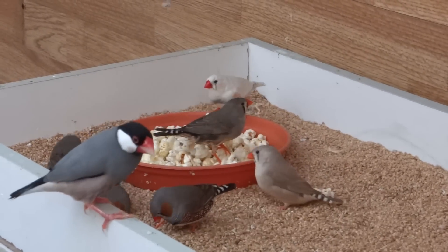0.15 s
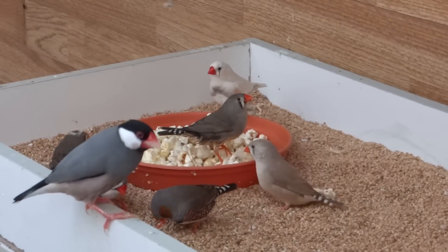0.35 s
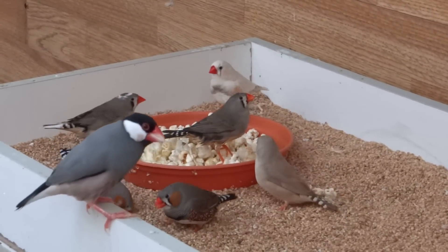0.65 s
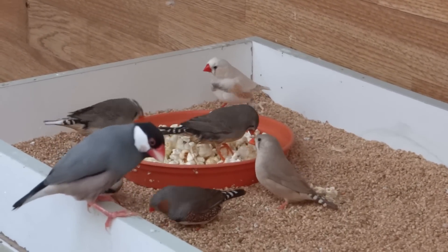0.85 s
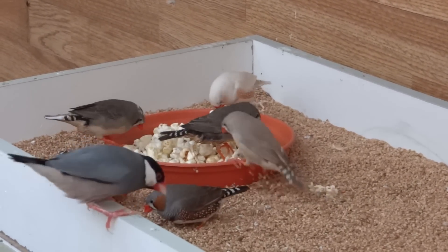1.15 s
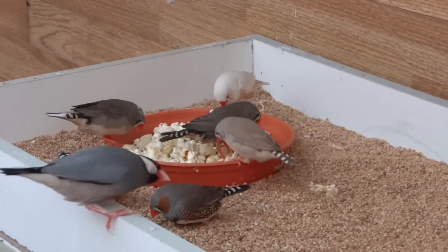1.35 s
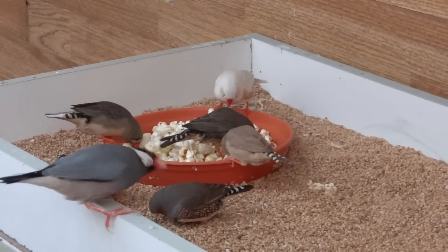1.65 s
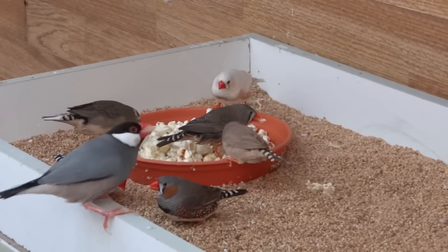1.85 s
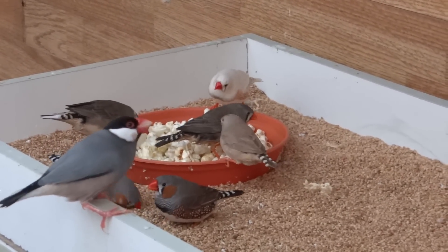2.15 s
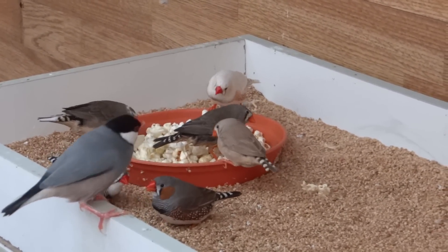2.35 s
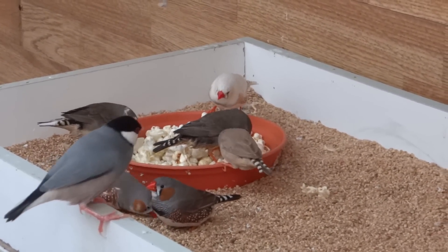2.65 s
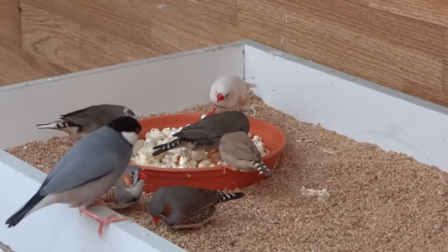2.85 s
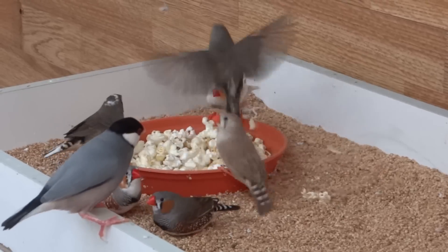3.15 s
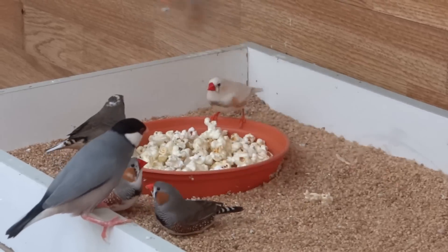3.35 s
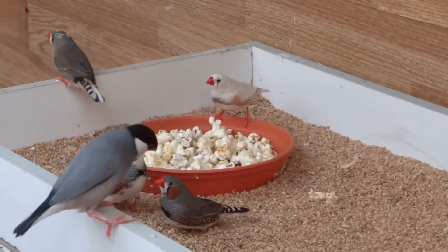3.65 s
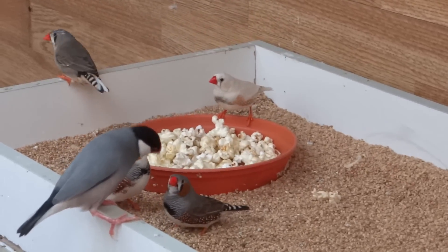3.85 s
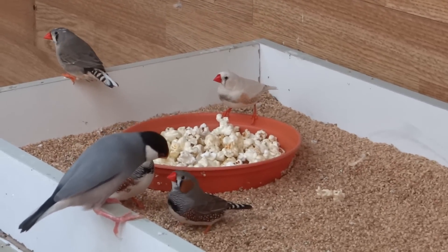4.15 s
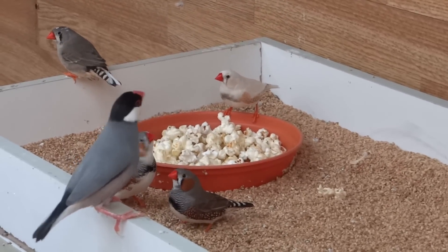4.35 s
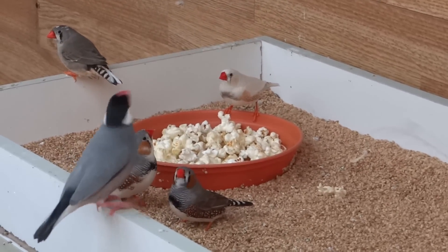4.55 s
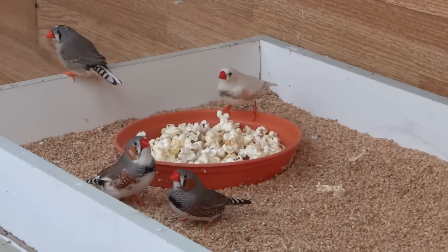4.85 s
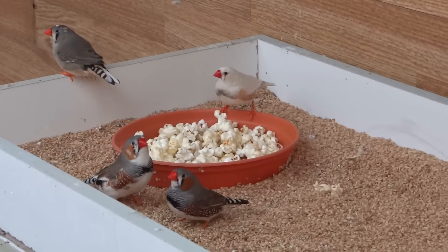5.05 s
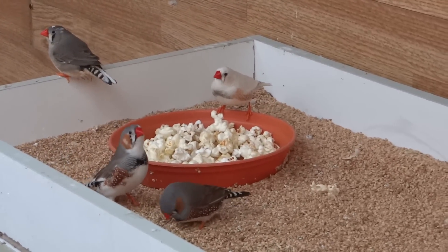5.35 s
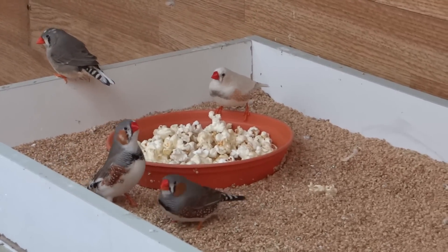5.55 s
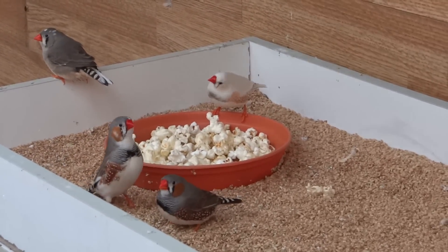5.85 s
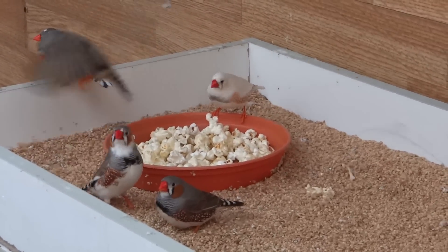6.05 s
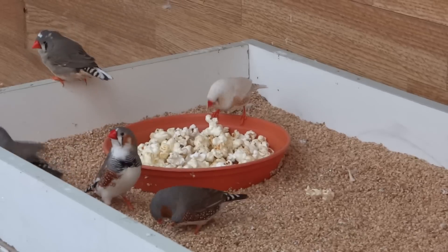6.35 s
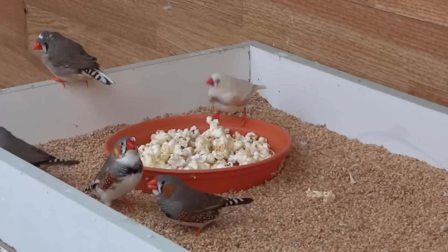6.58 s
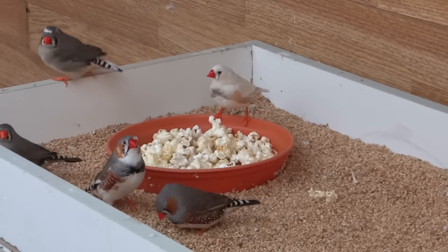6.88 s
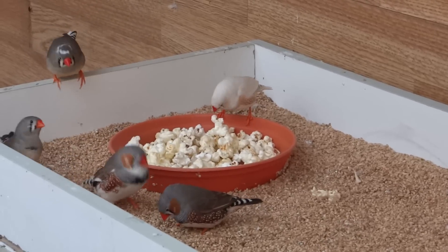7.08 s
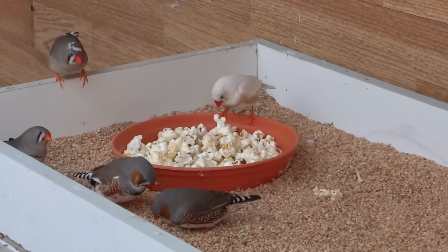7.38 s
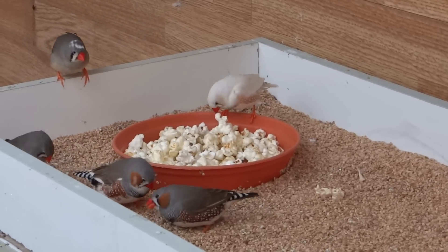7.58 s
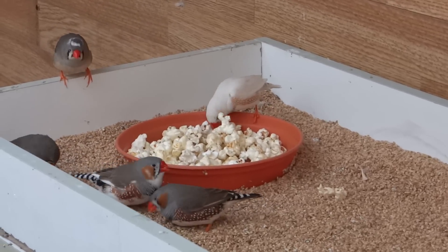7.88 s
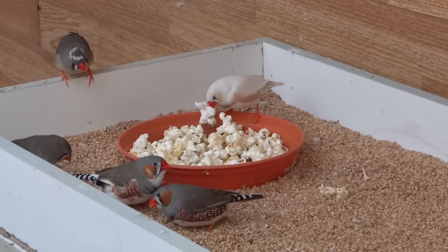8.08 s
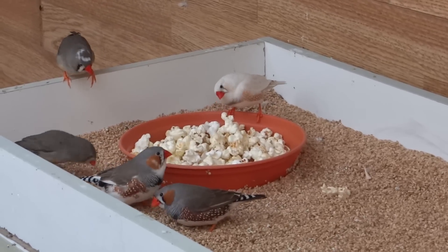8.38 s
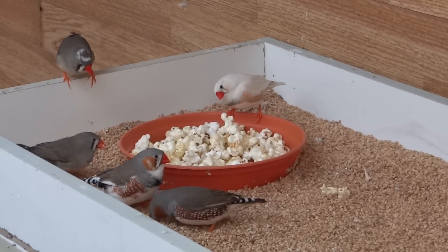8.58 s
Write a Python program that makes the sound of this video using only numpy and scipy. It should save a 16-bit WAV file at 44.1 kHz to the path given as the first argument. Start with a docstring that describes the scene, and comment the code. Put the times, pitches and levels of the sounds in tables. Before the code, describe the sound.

A small live room with a faint low murmur, finches close to the microphone. From 0 to 2.7 s, soft feather flutters at the start and near 1.5 s mix with tiny dry ticks of beaks and claws on grit and dish; a short nasal note sounds at 0.7 s, a faint thin whistle around 2.3 s. At 2.9-3.4 s hard wing strokes and airy flapping burst out, with small nasal calls to 3.6 s. A heavier flurry at 4.1-4.5 s brings snapping wing claps, a low draught and a bright double yip; lighter claps follow until 5 s. From 5.5 to 7.2 s come nasal, slightly rough whines, with sharp yips just after 7 s. Thin whimpers and short nasal notes continue. At 7.9 s a high squeal leaps and tumbles, then harsh rattling scolds from 8.1 s peak near 8.5 s and continue almost to the end.

```python
"""Finches crowd a food dish on a tray of grit in a small, live room, close to the microphone.
Short nasal notes, yips and thin whistles come from rough-edged harmonics shaped by throat and beak.
Wing beats arrive in uneven bursts of pulsing air and feather noise; claps and ticks are snaps of noise.
A quarrel builds from long whining calls to a squeal and a run of harsh scolds.
Table levels are source settings, before the room and the mix; colours are relative levels."""
import sys
import numpy as np
from scipy import signal
from scipy.fft import rfft, irfft
from scipy.io import wavfile
from scipy.ndimage import uniform_filter1d, minimum_filter1d

SR = 44100
rng = np.random.default_rng(int(sys.argv[2]) if len(sys.argv) > 2 else 0)


def file_out(sig):
    """Save sig as 16-bit WAV at sys.argv[1]."""
    # one column per channel
    cols = np.atleast_2d(sig).T
    # limit, then scale
    lim = np.clip(cols, -1, 1)
    pcm = np.round(lim * 32767).astype(np.int16)
    wavfile.write(sys.argv[1], SR, pcm)


N = 384552
TIME = np.arange(N) / SR
CUTOFF_HZ = 16200  # upper edge of the sound


def from_db(db):
    """Decibels to gain."""
    return 10 ** (np.asarray(db) / 20)


def rms_one(x):
    """Scale to unit power."""
    return x / np.sqrt(np.mean(x ** 2) + 1e-20)


def follow(rows, t):
    """Each column of a curve at the times t."""
    s, *columns = np.transpose(rows)
    return [np.interp(t, s, c) for c in columns]


def at_hz(points, hz):
    """Read a spectrum on a log-frequency axis."""
    f, value = np.transpose(points)
    return np.interp(np.log(np.maximum(hz, 1)), np.log(f), value)


def colour(x, points):
    """Causal (minimum-phase) filter of unit energy with the given spectrum."""
    size = 2048
    level_db = at_hz(points, np.arange(size + 1) * SR / (2 * size))
    cepstrum = irfft(np.log(from_db(level_db)))
    # folding the cepstrum forward in time makes the filter causal
    cepstrum[1:size] *= 2
    cepstrum[size + 1:] = 0
    response = irfft(np.exp(rfft(cepstrum)))
    return signal.fftconvolve(x, response / np.linalg.norm(response))[:len(x)]


def wander(rate, size):
    """Random motion of spread near 1, through straight lines between rate random points a second."""
    knots = rng.standard_normal(8192)
    return np.interp(np.arange(size) * rate / SR, np.arange(len(knots)), knots)


def add(out, s, x):
    """Mix a sound in at time s."""
    at = max(round(s * SR), 0)
    out[at:at + len(x)] += x[:max(N - at, 0)]


def gate(t, length, attack, release):
    """Attack, hold until the length is over, release."""
    return np.clip(t / attack, 0, 1) * np.clip(1 - (t - length) / release, 0, 1)


# Low room murmur of air and appliances: time_s, level_db
MURMUR = [(0.0, -60.5), (0.58, -58), (1.14, -66.5), (1.53, -58.5), (2.57, -65), (3.54, -58.5), (4.25, -54),
          (4.9, -66.5), (6.04, -61), (7.09, -70), (8.06, -70), (8.72, -72.5)]
# Colour of the quiet room: frequency_hz, level_db
QUIET_COLOUR = [(18, -53), (30, -13), (48, -74), (89, -7.5), (156, -13.5), (230, 2), (449, -16.5),
                (761, -16), (1180, -36), (1270, -26), (1510, -27), (1740, -16.5), (2000, -26.5),
                (2600, -83), (4400, -120), (5000, -36), (9000, -27), (15000, -30)]


def background():
    """Coloured noise of slowly changing level, nearly alike in both channels."""
    mid = rms_one(colour(rng.standard_normal(N), QUIET_COLOUR))
    side = rms_one(colour(rng.standard_normal(N), QUIET_COLOUR))
    level_db = follow(MURMUR, TIME)[0] + 4.5
    return from_db(level_db) * (mid + from_db(-19.0) * side * np.array([[1], [-1]]))


def crackle(size, grain_db):
    """Barbs or grains slipping over each other: noise made of tiny unequal snaps."""
    grain = np.minimum(rng.exponential(1, size), 5)
    return rms_one(rng.standard_normal(size) * from_db(grain_db * grain))


# Bursts of wing beats: start_s, length_s, pushed_air_db, feather_rustle_db
FLUTTER_BURSTS = [(-.03, 0.033, -47, -48), (0.122, 0.1038, -49, -53), (0.381, 0.0896, -46.5, -55),
                  (1.209, 0.057, -55, -54.5), (1.35, 0.0374, -61, -52.5), (1.5, 0.146, -47.5, -50),
                  (2.863, 0.0285, -57, -71), (3.029, 0.062, -42.5, -59.5), (3.207, 0.101, -42, -50),
                  (3.369, 0.0555, -43, -67.5), (3.797, 0.08, -45.5, -53), (4.083, 0.197, -48.5, -48.5),
                  (4.231, 0.2264, -40.5, -46), (4.456, 0.099, -43, -45), (4.891, 0.0267, -49, -68),
                  (5.757, 0.2, -52, -49.5)]
# Restless shuffling of the flock between the bursts: time_s, level_db
SHUFFLING = [(0, -62), (.65, -53), (1.0, -59.5), (1.5, -62.5), (1.9, -66), (2.75, -66), (2.93, -60.5),
             (3.1, -51.5), (3.7, -49), (4.65, -49.5), (5.15, -53.5), (5.5, -62.5), (6.1, -58.5), (6.9, -66),
             (8.72, -64)]
# Hard wing strokes at take-off: start_s, length_s, level_db
TAKEOFF_STROKES = [(2.937, 0.0758, -32), (3.037, 0.0617, -34), (3.387, 0.027, -39.5), (3.801, 0.035, -40.5),
                   (4.266, 0.072, -39.5)]
# Colours of pushed air, rubbing feathers and hard strokes: frequency_hz, level_db
AIR_COLOUR = [(30, -22.5), (70, -20.5), (150, -18), (250, -12), (330, 5), (450, -6), (620, 2), (900, 1),
              (1200, 1), (2000, -4.5), (3500, -25.5), (8000, -31)]
FEATHER_COLOUR = [(800, -5.5), (2000, -2), (3500, -1), (6000, -3.5), (8700, 1.5), (10000, -4.5),
                  (11500, -18), (15500, -18.5)]
STROKE_COLOUR = [(200, -28.5), (600, -9), (1100, 5.5), (2800, 6.5), (5000, 3), (8700, -1), (11500, -12.5),
                 (15500, -24)]
BEATS_PER_S = 22.4  # mean wing beat rate
BURST_ATTACK_S, BURST_RELEASE_S = 0.0224, 0.0526
SHUFFLE_AIR_DB = 0.5  # air that the shuffling pushes, relative to its rustle


def wings():
    """Each beat pushes a puff of air and rubs the feathers; bursts of uneven beats rise from the shuffling."""
    shuffle_db, = follow(SHUFFLING, TIME)
    push = from_db(shuffle_db + SHUFFLE_AIR_DB)
    rub = from_db(shuffle_db)
    for s, length, air_db, feather_db in FLUTTER_BURSTS:
        effort = gate(TIME - s, length, BURST_ATTACK_S, BURST_RELEASE_S)
        # powers add
        push = np.hypot(push, from_db(air_db) * effort)
        rub = np.hypot(rub, from_db(feather_db) * effort)

    beat = 2 * np.pi * np.cumsum(BEATS_PER_S * (1 + 0.14043 * wander(9.8, N))) / SR
    air = colour(rng.standard_normal(N), AIR_COLOUR) * from_db(4.62 * np.cos(beat))
    rustle_db = 2.43 * np.cos(beat + 1) + 1.524 * wander(120, N)
    feathers = colour(crackle(N, grain_db=4.0), FEATHER_COLOUR) * from_db(rustle_db)
    out = from_db(1.0) * push * rms_one(air) + from_db(4.0) * rub * rms_one(feathers)

    for s, length, db in TAKEOFF_STROKES:
        t = TIME[:SR // 4]
        swish = colour(crackle(len(t), grain_db=5.5), STROKE_COLOUR)
        add(out, s, from_db(db) * swish * np.interp(t / length, [0, .2, 1], [0, 1.3, 0]))
    return out


def snap(snap_t60, rub_db, rub_t60):
    """A sharp contact with a short rub, each dying away by 60 dB in its t60 in s."""
    t = TIME[:SR // 8]
    decay = from_db(-60 * t / snap_t60) + from_db(rub_db - 60 * t / rub_t60)
    return crackle(len(t), grain_db=1.17) * decay


# Wing tips clapping: start_s, level_db
WING_CLAPS = [(2.95, -33.5), (4.179, -30), (4.228, -31), (4.272, -26), (4.284, -35.5), (4.348, -38.5),
              (4.717, -34), (4.812, -36), (4.896, -33), (4.94, -32), (4.985, -33.5), (5.031, -33.5)]
# Beaks and claws on grit and dish: start_s, level_db, dish_body_db (relative)
GRIT_TICKS = [(0.1429, -43.5, -14.5), (0.357, -45, -0.5), (0.402, -48, -23), (0.819, -41, -7),
              (0.9012, -49.5, -4), (0.967, -49, -15.5), (1.0823, -39.5, -8), (1.1952, -44, -13),
              (1.3194, -43.5, -6), (1.3849, -48.5, -2), (1.486, -47, -8.5), (2.0369, -47, -18.5),
              (2.2048, -58.5, -5.5), (2.4277, -50.5, -6), (2.5374, -49.5, -25.5), (3.146, -38.5, -5),
              (3.454, -33.5, -24.5), (3.643, -38.5, -4), (3.9409, -37, -6.5), (4.0207, -46.5, -29.5),
              (4.105, -43, -8.5), (4.18, -34, -7.5), (4.609, -41.5, -13.5), (4.6692, -42, -23),
              (6.0239, -38.5, -10.5), (6.9621, -55, -9.5)]
# Colours of clap, grit and ringing dish: frequency_hz, level_db
CLAP_COLOUR = [(40, -16), (150, -2.5), (500, 3), (1200, 7), (2800, -1), (5000, -5.5), (8700, 5),
               (11500, -8.5), (15500, -21.5)]
GRIT_COLOUR = [(2000, -5), (4000, 6.5), (6300, 8), (8700, 9.5), (11500, 0), (15500, -28)]
DISH_COLOUR = [(700, -26.5), (1500, 25), (2000, 21), (3500, 22), (5000, -36), (9000, 4)]


def contacts():
    """Wing tips clap; pecks and hops scatter grit and knock the dish, each a snap coloured by what is hit."""
    out = np.zeros(N)
    for s, db in WING_CLAPS:
        clap = colour(snap(snap_t60=0.0257, rub_db=-8.5, rub_t60=0.016), CLAP_COLOUR)
        add(out, s, from_db(db - 2.0) * clap)
    for s, db, body_db in GRIT_TICKS:
        touch = snap(snap_t60=0.01366, rub_db=-5.5, rub_t60=0.134)
        dish = from_db(body_db + 4.0) * colour(touch, DISH_COLOUR)
        add(out, s, from_db(db + 3) * (colour(touch, GRIT_COLOUR) + dish))
    return out


def beak(hz, centre_hz, db):
    """The open beak lifts a broad band around its resonance, in dB."""
    return db / (1 + (np.log(hz / centre_hz) / 0.549) ** 2)


def syrinx(hz, rough, beak_hz, throat, jitter, beak_db, slope_db=0):
    """Harmonics of a membrane whose cycles grow irregular when pressed, shaped by throat and open beak."""
    size = len(hz)
    unsteady = hz * np.exp(jitter * rough * wander(1100, size))
    phase = 2 * np.pi * np.cumsum(unsteady) / SR
    k = np.arange(1, int(CUTOFF_HZ / hz.min()) + 1)[:, None]
    partial = k * unsteady
    # every call favours a few harmonics of its own
    favour_db = 2.5 * rng.standard_normal((64, 1))[:len(k)]
    outlet_db = at_hz(throat, partial) + beak(partial, beak_hz, beak_db)
    gain = from_db(outlet_db + slope_db * np.log2(k) + favour_db) * (partial < SR / 2)
    # hold the power steady while the partials slide through the resonances
    gain /= np.sqrt(uniform_filter1d(np.sum(gain ** 2, axis=0), size=400) / 2 + 1e-20)
    tone = np.sum(gain * np.sin(k * phase), axis=0)
    tone = tone * from_db(5.76 * rough * wander(700, size))

    # air leaks through once a cycle and leaves by the same throat and beak
    leak_colour = []
    for f, db in throat:
        fall_db = min(slope_db, 0) * np.log2(max(f / hz.mean(), 1))
        leak_colour.append((f, db + beak(f, np.mean(beak_hz), beak_db) + fall_db))
    leak = rng.standard_normal(size) * (1 + np.cos(phase))
    hiss = rms_one(colour(leak, leak_colour))
    return rms_one(tone + 0.589 * rough * hiss)


def notes(rows, throat, arch, jitter, beak_db, slope_db, rattle_db, crest, warble=0):
    """Brief notes: pressure swells and drops, arching the pitch; a rattle chops them and sweeps rough ones."""
    out = np.zeros(N)
    for s, length, start_hz, end_hz, db, rough, beak_hz in rows:
        u = np.linspace(0, 1, int(length * SR))
        # the rattle runs unevenly at about 165 Hz
        cycle = 2 * np.pi * np.cumsum(165 * (1 + 0.2383 * wander(150.6, len(u)))) / SR
        glide = start_hz * (end_hz / start_hz) ** u
        hz = glide * np.exp(arch * (.2 - (2 * u - 1) ** 4) + warble * rough * np.cos(cycle))
        swell = np.abs(np.sin(np.pi * u ** crest)) ** .5 * signal.windows.tukey(len(u), .12)
        rattle = rms_one(from_db(rattle_db * np.sin(cycle)))
        sound = syrinx(hz, rough, beak_hz, throat, jitter, beak_db, slope_db)
        add(out, s, from_db(db) * swell * rattle * sound)
    return out


# Short nasal contact notes, pitch before arching:
# start_s, length_s, start_hz, end_hz, level_db, roughness (0-1), beak_resonance_hz
CONTACT_NOTES = [(.738, 0.056, 607.6, 531.8, -34, 0.2, 3170),
                 (2.792, 0.0397, 600.2, 546.9, -42.5, 0.28, 3130),
                 (3.345, 0.0565, 569, 518.4, -41, 0.17, 2620),
                 (3.51, 0.0294, 507, 482.4, -35.5, 0.17, 3170),
                 (3.538, 0.0676, 547.4, 510.4, -33.5, 0.09, 2980),
                 (5.134, 0.0264, 496.6, 511.9, -37.5, 0.26, 6320),
                 (5.148, 0.0362, 496.6, 479.7, -32, 0.16, 4100),
                 (5.785, 0.05, 480.3, 450.8, -28, 0.82, 3790),
                 (6.197, 0.052, 566.7, 559.2, -34.5, 0.37, 3650),
                 (7.36, 0.0587, 553, 488.9, -39, 0.9, 3950),
                 (7.518, 0.0462, 565.4, 529.2, -30.5, 0.16, 3050),
                 (8.048, 0.0495, 550, 537.7, -29.5, 0.27, 3100)]
# Nasal throat colour: frequency_hz, level_db
NASAL_THROAT = [(150, -39.5), (450, -16.5), (1050, 0), (1500, -5.5), (2100, -0.5), (2800, -2.5), (4000, -4),
                (4700, -5.5), (5500, -8.5), (6500, -12), (8500, -15), (10500, -16.5), (12500, -30),
                (15000, -35.5)]


def contact_notes():
    """Low notes rich in harmonics pass a nasal throat."""
    return notes(CONTACT_NOTES, NASAL_THROAT, arch=0.0878, jitter=0.098, beak_db=18.5, slope_db=3,
                 rattle_db=3.0, crest=1.43, warble=0.035)


# Thin sliding whistles and whimpers, pitch before arching:
# start_s, length_s, start_hz, end_hz, level_db, roughness (about 0-1)
THIN_WHISTLES = [(2.102, 0.089, 2352, 1857, -63.5, 0.02), (2.239, 0.0585, 4230, 2830, -54.5, 0.28),
                 (2.303, 0.0523, 2593, 2358, -40, 0.1), (2.677, 0.0434, 2707, 2195, -64, 0.15),
                 (2.739, 0.0706, 2110, 1955, -57, 0.25), (2.866, 0.0268, 1358, 1027, -54, 0.49),
                 (4.4, 0.0532, 1136, 1236, -42.5, 0.12), (6.467, 0.0616, 1032, 637.5, -45, 0.25),
                 (6.635, 0.05, 1891, 1613, -37, 0.77), (6.645, 0.0567, 1094, 614.3, -45.5, 0.04),
                 (7.154, 0.0522, 1172, 947.6, -39, 0.88), (7.226, 0.0778, 1001, 865.7, -44.5, 0.78),
                 (7.36, 0.0287, 1497, 1105, -41, 1), (7.364, 0.047, 2400, 1980, -40.5, 0.62),
                 (7.411, .044, 1079, 747.5, -43.5, 0.52), (7.498, 0.0427, 1404, 1054, -43.5, 0.77),
                 (7.574, 0.0238, 1926, 1556, -40.5, 0.16), (7.705, 0.109, 2824, 1577, -48, 0.34),
                 (8.099, 0.0203, 1426, 1237, -38, 0), (8.372, 0.01025, 2723, 3007, -22.5, 0.42),
                 (8.398, 0.041, 1964, 1692, -37, 0.99), (8.614, 0.0148, 1325, 1314, -33, 1.01)]
# Pure throat colour, shared with the squeal: frequency_hz, level_db
PURE_THROAT = [(200, -52.5), (700, -23), (1300, 3), (3800, 9), (5500, 5.5), (8000, 14.5), (11000, 5),
               (15000, -42)]


def whistles():
    """Whistles with weak upper harmonics leave a shut beak, which adds no resonance."""
    rows = [(*row, row[2]) for row in THIN_WHISTLES]  # the beak column has no effect at 0 dB
    return notes(rows, PURE_THROAT, arch=0.0257, jitter=0.1036, beak_db=0, slope_db=-18,
                 rattle_db=4.0, crest=1.0, warble=0.1395)


# Sharp yips, pitch before arching:
# start_s, length_s, start_hz, end_hz, level_db, roughness (0-1), beak_resonance_hz
SHARP_YIPS = [(2.338, 0.0207, 1249, 1186, -41, 0.695, 3550), (4.532, 0.01635, 1647, 1573, -19, 0.135, 3050),
              (4.552, 0.00857, 1628, 1578, -23, 0.13, 3080),
              (4.547, 0.01434, 1290, 1084, -24.5, 0.68, 2500),
              (4.711, 0.0161, 839.2, 749.7, -36, 0.76, 2620),
              (5.587, 0.02046, 1394, 1215, -28.5, 0.256, 2830),
              (7.012, 0.0275, 836.7, 747.9, -28, 0.966, 2450), (7.221, 0.018, 1097, 1113, -21, 0.52, 3330),
              (7.238, 0.0173, 1128, 977.3, -17.5, 0.55, 3456), (7.794, 0.022, 1129, 1190, -28, 0.367, 2960),
              (8.287, 0.0228, 1408, 1374, -22.5, 0.174, 3133)]
# Throat colour of the yips: frequency_hz, level_db
YIP_THROAT = [(200, -79), (700, -3), (1200, -2), (1800, -7.5), (2500, -10.5), (3500, -8.5), (4500, -20.5),
              (6000, -17.5), (8500, -16), (11000, -24), (15000, -37)]


def yips():
    """Very short notes with a steep pitch arch and a strong beak resonance."""
    return notes(SHARP_YIPS, YIP_THROAT, arch=0.3872, jitter=0.151, beak_db=31, slope_db=2.5,
                 rattle_db=2.5, crest=1.79, warble=0.1626)


# Low draughts on the microphone as birds pass: start_s, level_db, fade_60_db_s
PASSING_GUSTS = [(3.04, -68, 0.5), (4.23, -59.5, 10), (6.42, -68, 6.5)]
GUST_ATTACK_S = 0.046


def draught():
    """Air stirred by passing wings rumbles on the microphone, each gust settling at its own pace."""
    flow = 0
    for s, db, t60 in PASSING_GUSTS:
        rise = np.clip((TIME - s) / GUST_ATTACK_S, 0, 1)
        flow = flow + rise * from_db(db - 60 * np.maximum(TIME - s, 0) / t60)
    rumble_colour = [(20, -25), (55, -3), (130, 10.5), (300, -30.5), (1000, -35.5)]  # Hz, dB
    return flow * colour(rng.standard_normal(N), rumble_colour)


def long_call(t, hz, db, rough, beak_hz, throat, jitter, beak_db, slope_db, warble):
    """One drawn-out call that follows its pitch, level and roughness; rough stretches also warble."""
    out = np.zeros(N)
    tremor = rough * wander(260, len(t))
    sound = syrinx(hz * np.exp(warble * tremor), rough, beak_hz, throat, jitter, beak_db, slope_db)
    add(out, t[0], from_db(db + 1.04 * tremor) * sound * signal.windows.tukey(len(t), .02))
    return out


# Long whining calls, pitch before warble: start_s, length_s, rise_s, start_hz, crest_hz, end_hz,
# level_db, roughness (0-1), beak_resonance_hz (at mid-call)
WHINING_CALLS = [(5.557, .27, 0.0585, 459.5, 511.4, 463.7, -29, 0.16, 3276),
                 (5.835, 0.138, 0.0228, 517.9, 602, 440, -22, 0.76, 4350),
                 (6.233, 0.111, 0.0491, 630.6, 694.4, 666, -28, 0.2, 3354),
                 (6.429, .187, 0.04495, 556.3, 605.7, 501.1, -23, 0.44, 4346),
                 (6.619, 0.1374, 0.04437, 513.3, 611, 515.3, -24.5, 0.62, 3993),
                 (6.985, 0.2172, 0.0599, 440.9, 503.4, 443.4, -31, 0, 3415)]
# Whining throat with ridges near 3 and 4.5 kHz: frequency_hz, level_db
WHINE_THROAT = [(400, -23), (1050, -0.5), (1500, -4.5), (2050, -2.5), (2550, -5.5), (3020, -1.5),
                (3450, -2), (3850, -3), (4550, -1), (5500, -8.5), (6500, -15), (8500, -15.5),
                (10500, -14.5), (15000, -46)]
WHINE_ATTACK_S, WHINE_RELEASE_S = 0.025, 0.0276
SAG_POWER = 1.5  # the pitch sinks ever faster after its crest
BREAK_S, BREAK_ROUGH = 0.064, 0.786  # as the pressure runs out the voice turns rough
WHINE_SWELL_DB, PRESSED_SWELL_DB = 2, 2.5  # middle of a whine over its ends; added at full roughness
BEAK_CLOSING = 0.121  # share by which the beak resonance lies lower at both ends


def whine(s, length, rise, start_hz, crest_hz, end_hz, db, rough, beak_hz):
    """Pitch climbs to a crest and sags; level swells as the beak opens, and the voice breaks up at the end."""
    t = np.arange(0, length, 1 / SR)
    climb = np.clip(1 - t / rise, 0, 1) ** 2
    sag = np.clip((t - rise) / (length - rise), 0, 1) ** SAG_POWER
    hz = crest_hz + (start_hz - crest_hz) * climb + (end_hz - crest_hz) * sag
    slack = (2 * t / length - 1) ** 2  # 0 in the middle, 1 at both ends
    level_db = db - (WHINE_SWELL_DB + PRESSED_SWELL_DB * rough) * slack
    breaking = np.clip(1 - (length - t) / BREAK_S, 0, 1)
    roughness = np.maximum(rough * (1 - .5 * slack), BREAK_ROUGH * breaking)
    moving_beak_hz = beak_hz * (1 - BEAK_CLOSING * slack)
    call = long_call(s + t, hz, level_db, roughness, moving_beak_hz, WHINE_THROAT,
                     jitter=0.0385, beak_db=20.0, slope_db=2.0, warble=0.02975)
    return call * gate(TIME - s, length - WHINE_RELEASE_S, WHINE_ATTACK_S, WHINE_RELEASE_S)


def whines():
    """All the whining calls, each with its own arc of pitch and pressure."""
    return sum(whine(*row) for row in WHINING_CALLS)


# The squeal that opens the fight, pitch before warble: time_s, pitch_hz, level_db, roughness (0-1)
SQUEAL_PATH = [(7.939, 3710, -36, 0.1), (7.947, 3600, -21.5, 0.2), (7.977, 2830, -28.5, 0.2),
               (7.995, 4163, -21.5, 0.31), (8.02, 2788, -27.5, 0.22), (8.05, 2168, -22, 0.47),
               (8.072, 1700, -39.5, 0.35), (8.12, 1420, -28, 0.37)]
SQUEAL_BEAK_HZ = 2960


def squeal():
    """One voice leaps and tumbles in pitch through a pure throat and open beak."""
    t = np.arange(SQUEAL_PATH[0][0], SQUEAL_PATH[-1][0], 1 / SR)
    hz, level_db, rough = follow(SQUEAL_PATH, t)
    return long_call(t, hz, level_db, rough, SQUEAL_BEAK_HZ, PURE_THROAT,
                     jitter=0.1272, beak_db=21.5, slope_db=-6.5, warble=0.247)


# Rattling scolds, pitch before arching:
# start_s, length_s, start_hz, end_hz, level_db, roughness (0-1), beak_resonance_hz
RATTLING_SCOLDS = [(8.12, 0.0542, 3872, 4393, -22, 0.672, 7900),
                   (8.13, 0.0433, 3655, 4027, -21, 0.877, 3900),
                   (8.235, 0.0361, 3880, 3884, -17.5, 0.804, 4400),
                   (8.296, 0.0496, 3138, 2987, -18.5, 0.738, 5700),
                   (8.37, 0.0518, 1486, 1498, -17.5, 0.852, 6400),
                   (8.463, 0.03, 1096, 1002, -29, 0.872, 4170),
                   (8.519, 0.0433, 1289, 1295, -12, 0.948, 4580),
                   (8.623, 0.0401, 1360, 1267, -16.5, 0.833, 5660)]
# Harsh throat colour: frequency_hz, level_db
HARSH_THROAT = [(200, -78.5), (600, -22.5), (1300, -15), (2000, -2.5), (3000, 0), (5200, 3), (6800, -2),
                (8700, 0), (10000, -11), (11300, -26.5), (15000, -33)]


def scolds():
    """Hard-pressed notes with very irregular cycles, chopped by the rattle."""
    return notes(RATTLING_SCOLDS, HARSH_THROAT, arch=0.1194, jitter=0.08566, beak_db=7.5, slope_db=2.0,
                 rattle_db=4, crest=0.582, warble=0.1103)


def voices():
    """All the calls of the flock; such small throats give no bass."""
    flock = contact_notes() + whistles() + yips() + whines() + squeal() + scolds()
    no_bass = signal.butter(4, 450, "high", fs=SR, output="sos")
    return signal.sosfilt(no_bass, from_db(1.0) * flock)


# Dying away of the room: frequency_hz, t60_s
ROOM_DECAY = [(200, 0.61), (1000, 0.3067), (3500, 0.2684), (8000, 0.1427), (15000, 0.2986)]
# Early reflections: delay_s, level_db
WALL_ECHOES = [(.0052, -20.5), (0.0096, -8.5), (0.0172, -23.5)]


def room(x, tail_db, side_db):
    """Near walls answer over a diffuse tail whose bass lingers longest; two close microphones hear nearly alike."""
    t = TIME[:SR // 2]
    edges = [60, 500, 1500, 3000, 6000, 10000, 18000]  # Hz
    tail = 0
    for low, high in zip(edges, edges[1:]):
        band_filter = signal.butter(2, [low, high], "band", fs=SR, output="sos")
        band = signal.sosfilt(band_filter, rng.standard_normal((2, len(t))))
        tail = tail + band * from_db(-60 * t / at_hz(ROOM_DECAY, np.sqrt(low * high)))
    tail = tail * np.clip(t / 0.00772, 0, 1)  # builds up over 7.72 ms
    mid, side = from_db(tail_db) * tail / np.linalg.norm(tail[0])
    side = signal.sosfilt(signal.butter(1, 350, "high", fs=SR, output="sos"), side)
    mid[0] += 1  # direct sound
    for delay, db in WALL_ECHOES:
        mid[round(delay * SR)] += from_db(db)
    responses = [mid + sign * from_db(side_db) * side for sign in (1, -1)]
    return np.array([signal.fftconvolve(x, response)[:N] for response in responses])


def scene():
    """The birds call and move a little to the left, over the room's murmur and the draughts."""
    left_right = np.array([[1], [-1]])
    movement = room(wings() + contacts(), tail_db=-3.0, side_db=-8.5) * from_db(0.303 * left_right)
    calls = room(voices(), tail_db=-1.5, side_db=-11.5) * from_db(0.59 * left_right)
    return background() + from_db(-3.5) * movement + calls + draught()


LIMIT = .52  # peak level, of full scale, above which the gain dips


def record(dry):
    """Gain dips smoothly around the loudest peaks; the deepest bass and the top are cut."""
    excess_db = 20 * np.log10(np.maximum(np.abs(dry).max(axis=0) / LIMIT, 1))
    gain_db = uniform_filter1d(minimum_filter1d(-excess_db, size=220), size=220)  # 5 ms windows
    bass_cut = signal.butter(2, 42, "high", fs=SR, output="sos")
    top_cut = signal.cheby2(16, 60, CUTOFF_HZ, fs=SR, output="sos")
    held = signal.sosfilt(bass_cut, dry * from_db(gain_db))
    return signal.sosfilt(top_cut, held)


dry = scene()
out = record(dry)
file_out(out)
```